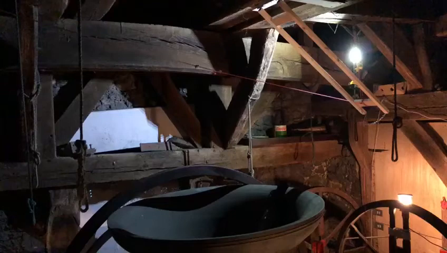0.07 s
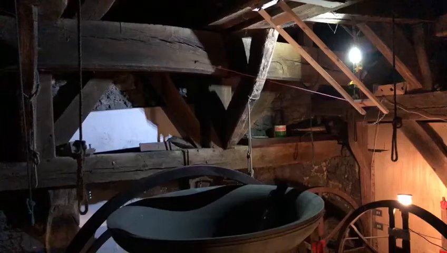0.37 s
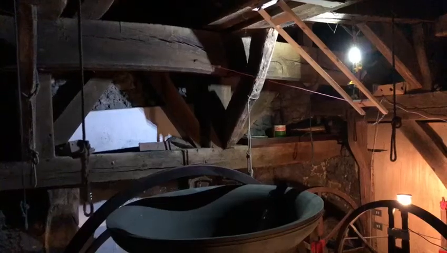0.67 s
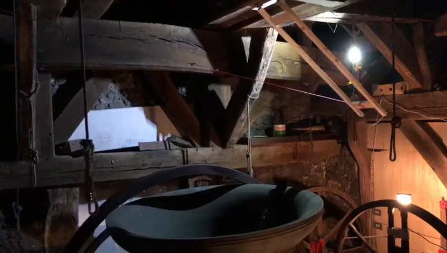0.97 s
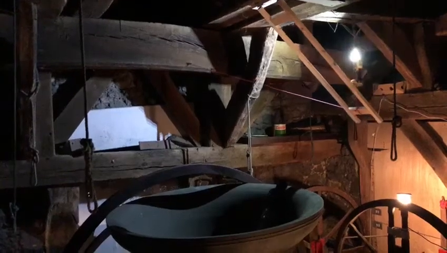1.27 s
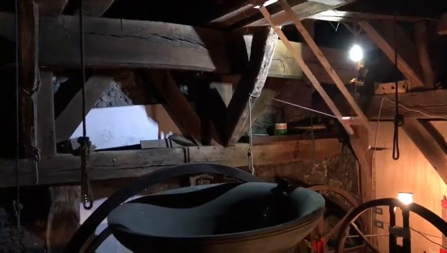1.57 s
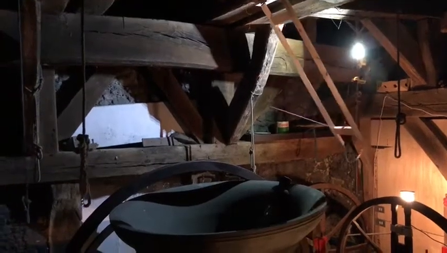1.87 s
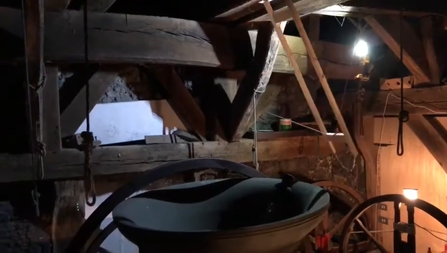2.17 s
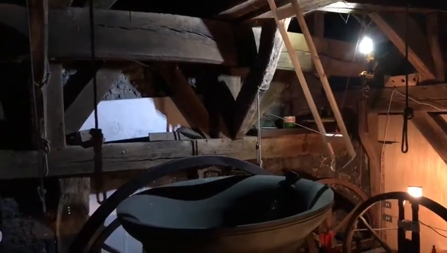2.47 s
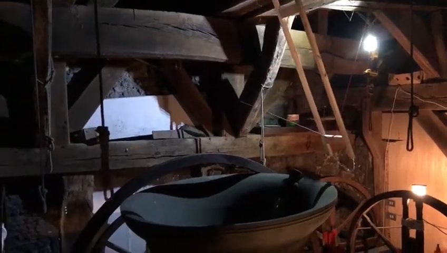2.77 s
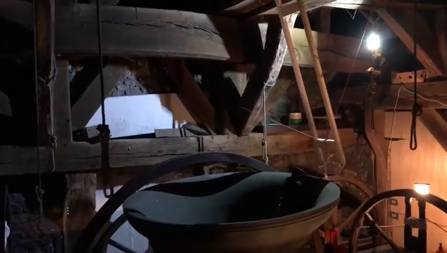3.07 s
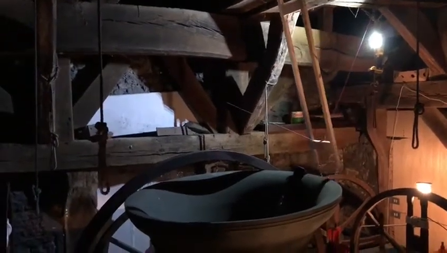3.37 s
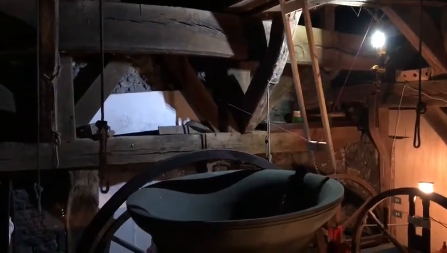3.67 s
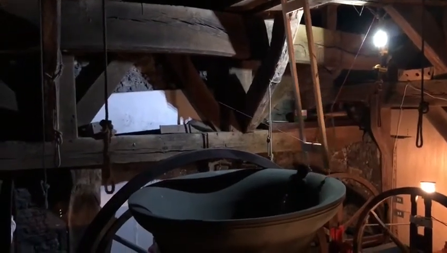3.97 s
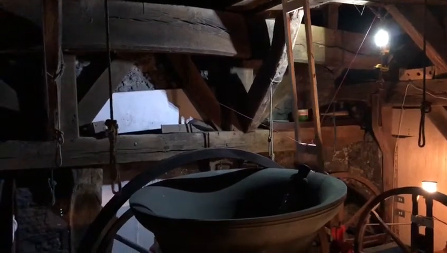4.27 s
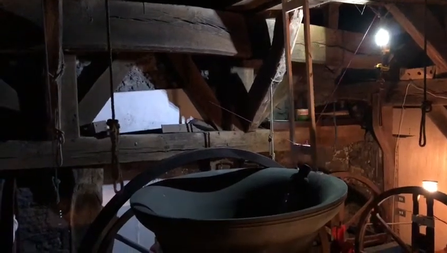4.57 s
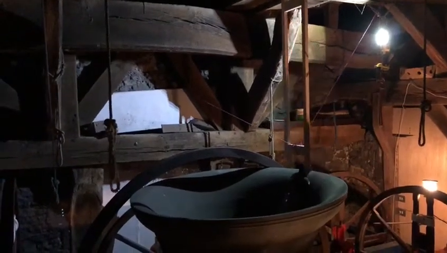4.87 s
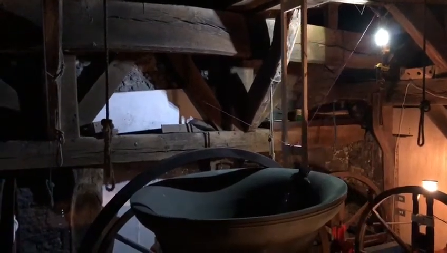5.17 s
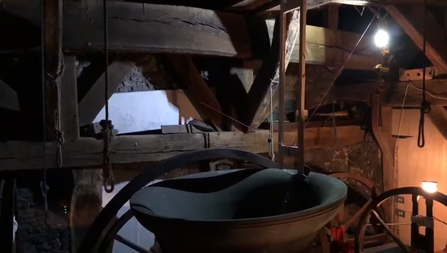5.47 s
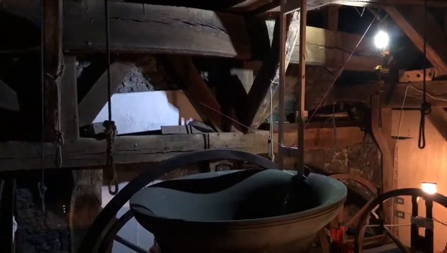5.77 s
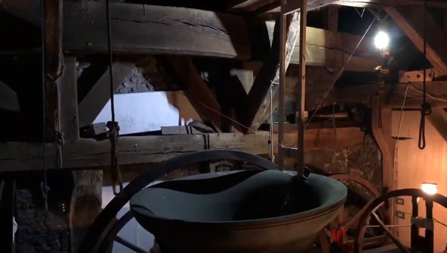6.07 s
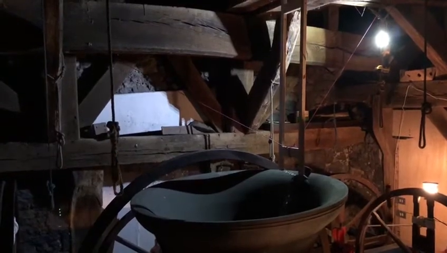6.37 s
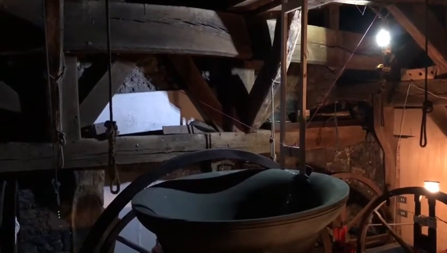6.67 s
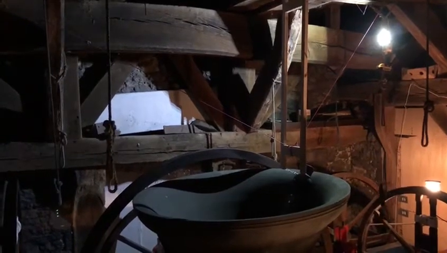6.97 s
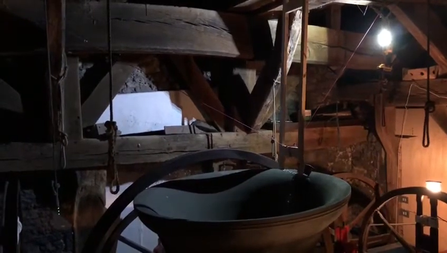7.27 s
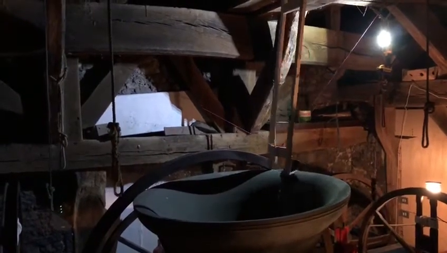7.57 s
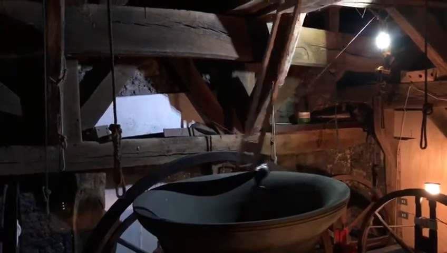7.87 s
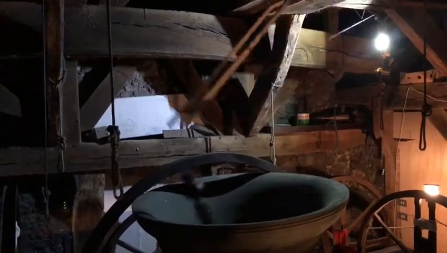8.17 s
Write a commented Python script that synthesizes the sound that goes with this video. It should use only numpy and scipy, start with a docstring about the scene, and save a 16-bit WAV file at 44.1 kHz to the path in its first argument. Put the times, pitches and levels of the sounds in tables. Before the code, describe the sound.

Short high metal squeals, scraping and wooden knocks in a quiet bell loft build to one loud bell clang.

```python
"""A timber bell loft, the microphone a few metres from the bell, a dull outdoor hush all round.
A wire slowly draws aside the wooden arm of a clapper catch. Its dry iron pivot squeals in short slips
and the clapper scrapes over the bronze lip. Then it is let go: the arm swings off with a rattle,
the clapper falls on the upturned bell, and the frame shudders as the bronze rings."""
import sys
import numpy as np
from scipy import signal
from scipy.fft import rfft, irfft, next_fast_len
from scipy.io import wavfile

SR = 44100
rng = np.random.default_rng(int(sys.argv[2]) if len(sys.argv) > 2 else 0)


def pcm_store(signal):
    """Save signal as 16-bit PCM."""
    levels = np.round(np.clip(np.atleast_2d(signal), -1, 1) * 32767)
    wavfile.write(sys.argv[1], SR, levels.astype(np.int16).T)


N = 371322
TIME = np.arange(N) / SR
PULL_S, STRIKE_S = 1.203, 8.3635   # the wire takes the load; the clapper lands


def from_db(db):
    """Decibels to gain."""
    return 10 ** (np.asarray(db) / 20)


def unit_power(x):
    """Scale to an RMS of 1."""
    return x / np.sqrt(np.mean(x ** 2) + 1e-20)


def at_hz(points, hz):
    """Read a table on a log-frequency axis."""
    freqs, values = np.transpose(points)
    return np.interp(np.log(hz + 1e-9), np.log(freqs), values)


def coloured(x, spectrum):
    """Give a steady excitation a spectrum that falls away below its first point; unit power."""
    size = next_fast_len(N)
    hz = np.arange(size // 2 + 1) * SR / size
    gain = from_db(at_hz(spectrum, hz)) * np.minimum(hz / spectrum[0][0], 1) ** 2
    return unit_power(irfft(rfft(x, size) * gain, size)[:N])


def drift(rate_hz, size=N):
    """A smooth random wander with a spread of about 1."""
    r = np.exp(-2 * np.pi * rate_hz / SR)
    smooth = signal.lfilter([1], [1, -2 * r, r * r], rng.standard_normal(size + SR // 2))
    return unit_power(smooth[SR // 4:])[-size:]


def resonate(x, hz, width):
    """A resonance with gain 1 at its peak."""
    r, w = np.exp(-np.pi * width / SR), 2 * np.pi * hz / SR
    return signal.lfilter(np.array([1, 0, -1]) * (1 - r * r) / 2, [1, -2 * r * np.cos(w), r * r], x + 1e-18)


def ring(force, hz, t60):
    """A mode that a unit click sets ringing with height 1."""
    r, w = from_db(-60 / (t60 * SR)), 2 * np.pi * hz / SR
    return signal.lfilter([0, np.sin(w)], [1, -2 * r * np.cos(w), r * r], force + 1e-18)


def grains(per_s, spread_db):
    """Tiny slips of uneven size at random moments."""
    impulses = (rng.random(N) < per_s / SR) * rng.choice([-1, 1], N)
    return impulses * from_db(spread_db * np.clip(rng.standard_normal(N), -2, 2))


def clicks(rows):
    """Single clicks from rows of (time [s], level [dB])."""
    s, db = np.transpose(rows)
    return np.bincount((s * SR).astype(int), from_db(db), N)[:N]


def decay(s, fade_s):
    """Jumps to 1 at time s, then falls by a factor e every fade_s."""
    out = np.zeros(N)
    add(out, s, np.exp(-TIME[:int(20 * fade_s * SR)] / fade_s))
    return out


def envelope(s, attack, hold, release):
    """Grows to 1 at time s, holds, then dies; attack and release are seconds for a factor e."""
    return np.exp(np.minimum(TIME - s, 0) / attack - np.maximum(TIME - s - hold, 0) / release) + 1e-18


def add(track, s, sound):
    """Mix a sound in at time s."""
    start = int(s * SR)
    track[start:start + len(sound)] += sound[:N - start]


# Outdoor air as heard inside the loft: (frequency [Hz], relative level [dB])
HUSH_COLOUR = [(15, -52), (25, -35), (52, -10.5), (70, -1.5), (86, -7.5), (124, -5.5), (291, -11),
               (407, -12), (555, -18.5), (615, -17.5), (954, -15), (3300, -38.5), (3560, -41.5),
               (3950, -45), (12000, -51.5), (15600, -74), (22000, -120)]
# Low resonances of the tower: (frequency [Hz], width [Hz], relative level [dB])
TOWER_MODES = [(65.2, 7.3, -59), (119.3, 11.3, -55)]
def hush():
    """Dull outdoor noise all round the microphone, booming a little in the tower."""
    air = from_db(-51.63) * coloured(rng.standard_normal(N), HUSH_COLOUR)
    boom = sum(from_db(db) * unit_power(resonate(rng.standard_normal(N), hz, width))
               for hz, width, db in TOWER_MODES)
    return (air + from_db(-3) * boom) * from_db(.5 * drift(1.6))


# Reverberation among the beams: (frequency [Hz], time to fall 60 dB [s])
LOFT_DECAY = [(100, 0.66), (1000, 0.35), (4000, 0.41), (8000, 0.22), (12000, 0.17)]
def loft(x, direct_db):
    """The microphone hears the direct sound and a dense tail off the beams, treble dying first."""
    age = TIME[:SR * 3 // 4]
    noise, hz = rfft(rng.standard_normal(len(age))), np.fft.rfftfreq(len(age), 1 / SR)
    edges = np.append(0, np.geomspace(180, SR / 2, 12))
    tail = 0
    for low, high in zip(edges, edges[1:]):
        band = irfft(noise * (hz >= low) * (hz < high), len(age))
        fall = from_db(-60 * age / at_hz(LOFT_DECAY, (low + high) / 2))
        tail = tail + band * fall / np.linalg.norm(fall)
    direct = from_db(direct_db)
    return (direct * x + signal.fftconvolve(x, tail)[:N]) / np.hypot(direct, 1)


# Groans of the timber bearing: (peak time [s], level [dB], swell and fade time [s])
BEARING_GROANS = [(1.83, -58, 0.27), (2.25, -56, .11), (3.08, -55.5, .11), (3.41, -63, 0.065),
                  (4.4, -56.5, .7), (5.42, -51, 0.11)]
def bearing():
    """Slow slips in the timber bearing swell and fade through a low wooden resonance."""
    load = sum(from_db(db) * envelope(s, attack=fade, hold=0, release=fade)
               for s, db, fade in BEARING_GROANS)
    slips = grains(per_s=460, spread_db=3.5)
    hz, width = 590, 450
    return load * unit_power(resonate(resonate(slips, hz, width), hz, width))


# Crackle of strained wood: (frequency [Hz], relative level [dB])
FIBRE_COLOUR = [(900, -24), (1600, 1), (2400, -3), (3050, 1), (3800, -4), (7500, -20), (11000, -51)]
def creak():
    """Wood fibres slip in a soft crackle as the arm first takes the load."""
    load = from_db(-55) * envelope(PULL_S, attack=.004, hold=.1, release=.2)
    return load * coloured(grains(per_s=330, spread_db=2.5), FIBRE_COLOUR)


# Resonances of the wire and hook: (frequency [Hz], width [Hz], gain [dB])
IRON_MODES = [(3200, 62, -14), (4310, 210, 2.5), (5130, 10, 8), (8200, 230, 3), (10900, 160, -2)]
def ironwork(x):
    """Contact noise together with the resonances it wakes in the iron."""
    return x + sum(from_db(db) * resonate(x, hz, width) for hz, width, db in IRON_MODES)


# Small hard contacts: (frequency [Hz], relative level [dB])
CONTACT_COLOUR = [(300, -15), (900, -12.5), (2900, -2), (5000, 4.5), (8000, -2), (11100, -4), (11900, -30)]
def chatter(rows, snap):
    """Each contact is a sharp touch followed by a short burst of tiny bounces."""
    force = sum(from_db(db) * (decay(s, fade) + snap * decay(s, 0.00039)) for s, db, fade, *_ in rows)
    return force * coloured(grains(per_s=9000, spread_db=3), CONTACT_COLOUR)


# Rubbing iron: (frequency [Hz], relative level [dB])
IRON_RUB_COLOUR = [(1500, -67), (3000, -2), (5200, 11), (6500, 0.5), (8000, -1), (9800, -2), (11100, 5),
                   (11700, -32)]
# Short metallic clinks and bursts of rasp at the pivot's squeals:
# (time [s], relative level [dB], chatter fade [s])
CLINKS_AND_RASPS = [(1.115, -63, .004), (1.146, -65, .006), (1.207, -51, 0.0041), (1.271, -48.5, 0.01),
                    (1.32, -60, .015), (1.62, -50.5, .022), (1.74, -50.5, .012), (2.236, -49, 0.018),
                    (2.518, -58, 0.0046), (2.866, -53, .02), (3.408, -49.5, .005), (5.304, -59, .004),
                    (5.399, -69, .004), (7.156, -56.5, .003), (8.237, -22.5, 0.0059), (8.254, -26, .014)]
def rub_and_clinks():
    """The taut wire rubs, easing as the arm comes round; short clinks and rasps sound over it."""
    pull = envelope(PULL_S, attack=0.02, hold=2.5, release=0.16)
    rub_db = -71.5 - 1.5 * (TIME - PULL_S) + drift(18)
    rub = pull * from_db(rub_db) * coloured(grains(per_s=2200, spread_db=2.5), IRON_RUB_COLOUR)
    return ironwork(rub + from_db(-1.5) * chatter(CLINKS_AND_RASPS, snap=0.26))


# Knocks of the wooden arm: (time [s], relative ring level [dB], relative crack level [dB])
ARM_KNOCKS = [(7.451, -32, -43.5), (7.714, -35, -36), (7.868, -32.5, -30.5), (7.96, -34.5, -30),
              (8.08, -36, -35.5)]
# Modes of the arm: (frequency [Hz], relative level [dB], time to fall 60 dB [s])
ARM_MODES = [(475, -0.5, 0.22), (523, 0.5, 0.14), (596, -3, 0.15), (812, 0, 0.068), (1188, -1.5, 0.13),
             (2296, -16.5, 0.16), (2470, -34, 0.055)]
def knocks():
    """Play in the arm is taken up with a soft crack and a short wooden ring."""
    wood = 0
    for hz, mode_db, t60 in ARM_MODES:
        taps = clicks([(s, db + mode_db + rng.standard_normal()) for s, db, _ in ARM_KNOCKS])
        wood = wood + ring(taps, hz, t60)
    force = sum(from_db(db) * decay(s, 0.013) for s, _, db in ARM_KNOCKS)
    crack = force * coloured(rng.standard_normal(N), CONTACT_COLOUR)
    return from_db(-7) * wood + from_db(-4) * ironwork(crack)


# The swinging arm's low rumble and brighter rattle: (frequency [Hz], relative level [dB])
ARM_RUMBLE_COLOUR = [(100, -4.5), (170, -6.5), (320, -2.5), (700, 0), (1200, -10), (1700, -23.5),
                     (4000, -26.5)]
ARM_RATTLE_COLOUR = [(200, 2), (700, 0.5), (1800, 2.5), (3300, 0.5), (4200, -7), (5500, -6), (6500, -11.5),
                     (11100, -15), (11900, -43)]
def swing():
    """The freed arm rumbles and rattles louder as it gathers speed, and grazes its guide once."""
    speed = envelope(8.18, attack=.18, hold=0.11, release=0.011)
    graze = envelope(8.158, attack=0.0057, hold=0.03, release=0.02)
    rumble = from_db(-31.5) * speed * coloured(grains(per_s=1800, spread_db=2.5), ARM_RUMBLE_COLOUR)
    shaking = from_db(-45) * speed ** 1.3 + from_db(-28) * graze
    return rumble + shaking * coloured(grains(per_s=1800, spread_db=0.5), ARM_RATTLE_COLOUR)


# How hard the clapper drags over the lip: (time [s], relative level [dB])
LIP_PRESSURE = [(3.881, -60), (4.151, -54), (4.38, -48), (4.7, -49.5), (4.95, -56), (5.28, -62.5),
                (5.49, -45), (5.55, -71), (5.62, -79)]
# It catches on the lip: (time [s], relative level [dB], chatter fade [s], relative ring level [dB])
LIP_CATCHES = [(3.885, -43.5, 0.096, -54), (4.126, -46.5, 0.01, -60), (4.35, -45, 0.018, -59),
               (4.485, -50, .015, -62), (4.571, -40.5, 0.031, -65), (4.696, -44.5, 0.015, -60),
               (4.829, -37.5, 0.024, -57), (5.481, -55, .014, -85)]
# Dull body and gritty edge of the scrape: (frequency [Hz], relative level [dB])
BODY_COLOUR = [(200, -18), (450, -1.5), (800, -5), (1700, 2.5), (2600, -8), (4000, -9.5), (8000, -65)]
GRIT_COLOUR = [(1000, -11), (2500, 3), (5500, -0.5), (6500, -2), (8000, -4), (11100, -11.5), (11900, -24)]
def scrape():
    """Iron drags over bronze in dense slips that follow the pressure, with a jolt at each catch."""
    times, db = np.transpose(LIP_PRESSURE)
    pressure = from_db(np.interp(TIME, times, db, left=-np.inf, right=-np.inf))
    jolts = sum(from_db(peak_db) * decay(s, fade) for s, peak_db, fade, _ in LIP_CATCHES)
    force = from_db(-3) * pressure + from_db(-5.5) * jolts
    body = force * coloured(grains(per_s=3000, spread_db=6), BODY_COLOUR)
    sharpness = from_db(-1 - 6 * (TIME - times[0]))   # the edge dulls as the clapper slides on
    grit = pressure * sharpness * coloured(grains(per_s=1300, spread_db=11.5), GRIT_COLOUR)
    return (body + grit) * from_db(1.1 * drift(48)) + from_db(-2) * chatter(LIP_CATCHES, snap=0.5)


def slip(length, hz, harmonics_db, rough, wander, jitter, flutter, swell, rise=0):
    """A stick-slip tone that swells and lets go; a rough contact makes its cycles and strength uneven."""
    ramp_s = swell * length
    size = int((length + ramp_s) * SR)
    age = TIME[:size]
    wobble = rough * (wander * drift(54, size) + jitter * drift(680, size))
    pitch = hz * (1 + rise * (age / length - .5) + wobble)
    phase = 2 * np.pi * np.cumsum(pitch) / SR
    tone = sum(from_db(db) * np.sin(k * phase) for k, db in enumerate(harmonics_db, 1))
    grip = np.clip(np.minimum(age, length + ramp_s - age) / ramp_s, 0, 1)
    flicker = unit_power(from_db(flutter * rough * np.tanh(drift(74, size))))
    return np.sqrt(2) * tone * grip * flicker


# Squeaks of the wooden joint: (time [s], length [s], pitch [Hz], level [dB], roughness [0-1])
JOINT_SLIPS = [(2.31, 0.064, 1032, -43.5, 0.34), (8.253, 0.018, 1011, -20, 0.7)]
# Their harmonics, from the fundamental up: (relative level [dB])
JOINT_HARMONICS = [0, -14, -32, -24, -25, -33, -37, -36]
def joint():
    """The wooden joint gives a reedy squeak, lower than the pivot's, that climbs a little."""
    out = np.zeros(N)
    for s, length, hz, db, rough in JOINT_SLIPS:
        squeak = slip(length, hz, JOINT_HARMONICS, rough,
                      wander=0.025, jitter=0.022, flutter=3, swell=0.19, rise=0.018)
        add(out, s, from_db(db) * squeak)
    return out


# Slips of the iron pivot; bite is the 2nd harmonic against the fundamental:
# (time [s], length [s], pitch [Hz], relative level [dB], bite [dB], roughness [0-1])
PIVOT_SLIPS = [ (1.295, 0.095, 3650, -53, -32, 0.4), (1.536, 0.054, 3700, -41.5, -17, 0.43),
               (1.599, 0.067, 3644, -40.5, -2, 0.66), (1.658, 0.044, 3716, -37, -24, 0.33),
               (2.074, .056, 3740, -66, -23, .4), (2.852, .057, 3756, -39.5, 4, 0.3),
               (2.906, 0.026, 3795, -35, -30, 0.3), (3.248, .066, 3770, -43, -4, 0.38),
               (3.43, .074, 3739, -43.5, -6, .35), (3.562, 0.061, 3740, -44, -3.5, 0.67),
               (3.646, 0.045, 3690, -52.5, -22, 0.32), (3.925, 0.029, 3743, -38.5, 1, 0.3),
               (4.19, 0.088, 3740, -53, -6, 0.54), (4.45, 0.056, 3745, -40, -1.5, 0.25),
               (5.111, 0.055, 3755, -50.5, -10, 0.13), (5.226, .036, 3740, -53.5, -14, 0.2),
               (6.721, .038, 3820, -60.5, -13, 0.3), (7.274, 0.12, 3930, -68, -9, .8),
               (7.379, 0.015, 3903, -39.5, -12.5, 0.9), (7.48, 0.076, 3940, -40, -5.5, 0.5),
               (7.605, .03, 3927, -34, 2, 0.52), (7.63, 0.053, 4083, -29.5, -1.5, 0.69),
               (7.672, 0.024, 3857, -33, 1, .3), (7.745, 0.037, 3866, -30, -1, 0.48),
               (7.807, 0.021, 3920, -32.5, 8, 0.64), (7.829, 0.015, 3860, -25, 8, 0.61),
               (7.86, 0.058, 3860, -31, -1, 0.81), (7.928, 0.019, 3885, -24.5, 5.5, .6),
               (7.956, 0.059, 3915, -31, -7, 0.84), (8.013, .011, 3885, -26, 7.5, 0.63),
               (8.03, 0.042, 3820, -34, -20, 0.46), (8.10, .033, 3860, -36, -2, 1.0)]
def pivot():
    """The dry pivot squeals on one high mode; a harder bite brings stronger harmonics and more rasp."""
    squeals, rubbing = np.zeros(N), np.zeros(N)
    lead_s = .004   # the tone starts just ahead of its rasp
    for s, length, hz, db, bite_db, rough in PIVOT_SLIPS:
        third_db = -7.5 + 0.91 * bite_db - 0.0308 * max(hz - 3700, 0)   # weaker on the highest slips
        tone = slip(length, hz, [0, bite_db, third_db], rough,
                    wander=0.00983, jitter=0.023, flutter=4, swell=0.33)
        add(squeals, s - lead_s, from_db(db - 2.7) * tone)
        rasp_db = db - 22.5 + 0.34 * bite_db
        add(rubbing, s, from_db(rasp_db) * np.sqrt(np.hanning(int(length * SR))))
    rasp = rubbing * coloured(grains(per_s=1700, spread_db=-9.5), IRON_RUB_COLOUR)
    return squeals + ironwork(rasp)


# Thud of the bell frame: (frequency [Hz], relative level [dB])
FRAME_COLOUR = [(120, -21), (180, -19), (245, 2.5), (350, -2), (700, -3), (1200, -7), (1700, -32)]
def frame():
    """The timber frame shudders under the blow."""
    shudder = from_db(-20.5) * envelope(STRIKE_S, attack=0.0083, hold=0, release=0.24)
    return shudder * coloured(rng.standard_normal(N), FRAME_COLOUR)


# Impact of the clapper: (frequency [Hz], relative level [dB])
IMPACT_COLOUR = [(130, -35), (200, -35), (400, -10.5), (1400, 4), (2500, -3.5), (4000, -11), (7000, -18),
                 (9000, -16.5), (12000, -40)]
def clapper():
    """Iron crashes on bronze: a hard crack, then a short wash of noise."""
    force = from_db(-6) * decay(STRIKE_S, 0.0078) + from_db(-13.5) * decay(STRIKE_S, 0.088)
    return force * coloured(rng.standard_normal(N), IMPACT_COLOUR)


# Partials of the bell: (frequency [Hz], gain when struck [dB], gain when touched on the lip [dB])
BELL_PARTIALS = [(331.6, -4.5, -10.5), (539.5, -2, -15.5), (810, -4.5, -1.5), (1126, -2.5, -14),
                 (1484, -5, -13), (1733, -14, -14), (1839, 1, -20), (2210, -28, -37), (2280, -27, -10),
                 (2410, -6.5, -22), (2643, -12, -14), (3083, -11, -13), (3080, -13, -15), (3495, -12, -8),
                 (3850, -14, -12), (4170, -12.5, -20), (4750, -17, -11), (5260, -36, -11.5),
                 (5641, -24, -3), (6000, -33, -12.5), (6300, -40, -19), (6920, -22, -22), (7105, -30, -24),
                 (7400, -34, -3), (8360, -40, -2), (8740, -40, 1), (9540, -41, -2), (10800, -42, -3)]
def bell(dragging):
    """The partials ring briefly while the clapper rests on the lip, and long after its free blow."""
    lip = clicks([(s, ring_db) for s, _, _, ring_db in LIP_CATCHES]) + from_db(-43.5) * dragging
    blow = clicks([(STRIKE_S, -14)])
    out = 0
    for hz, struck_db, touched_db in BELL_PARTIALS:
        damped = from_db(touched_db) * ring(lip, hz, t60=1.18 * (1000 / hz) ** 0.55)
        free = from_db(struck_db) * ring(blow, hz, t60=5.2)
        out = out + rng.choice([-1, 1]) * (damped + free)
    return out


def scene():
    """One microphone a few metres off: the catch sounds roomy, the blow more direct, the bell dry."""
    dragging = scrape()
    squeals = loft(pivot() + joint(), direct_db=1.5)
    mechanism = rub_and_clinks() + creak() + dragging + bearing() + knocks() + swing() + frame()
    mechanism = loft(mechanism, direct_db=1.5)
    stroke = loft(clapper(), direct_db=11) + bell(dragging)
    return (squeals + mechanism + stroke + hush())[None]


def record(dry):
    """The recorder opens after a moment, rounds the highest peaks and cuts the top."""
    open_s, cutoff_hz = .12, 11950
    live = dry * (TIME > open_s)
    rounded = 1.146 * np.tanh(live / 1.151)
    return signal.sosfilt(signal.ellip(10, .1, 80, cutoff_hz, fs=SR, output="sos"), rounded)


dry = scene()
out = record(dry)
pcm_store(out)
```